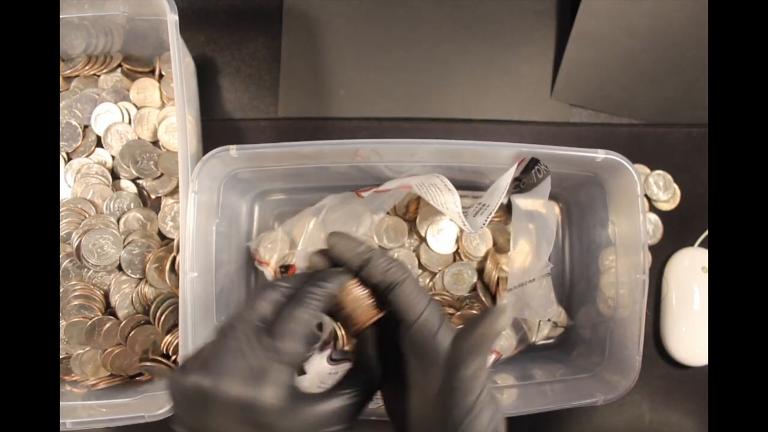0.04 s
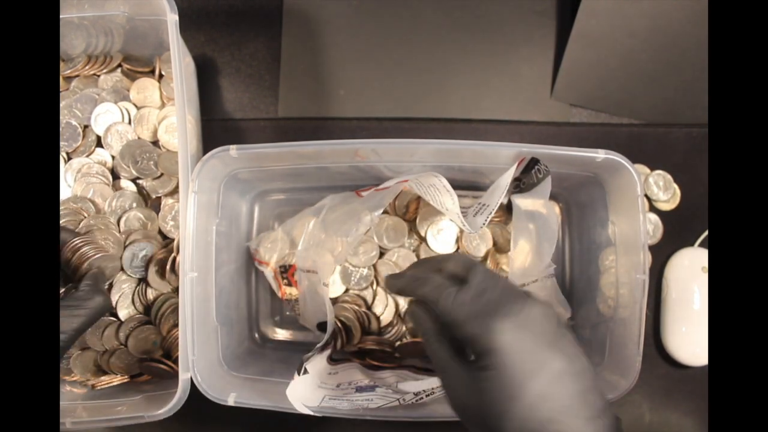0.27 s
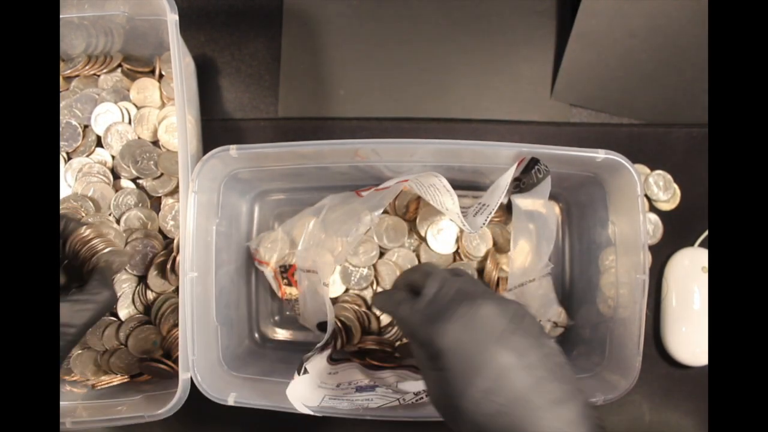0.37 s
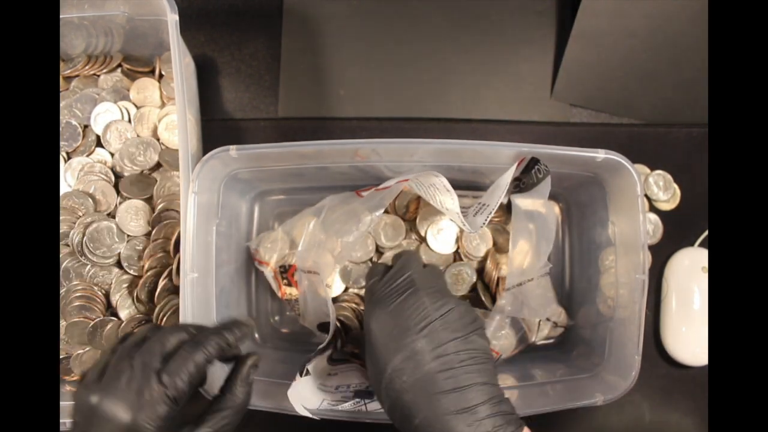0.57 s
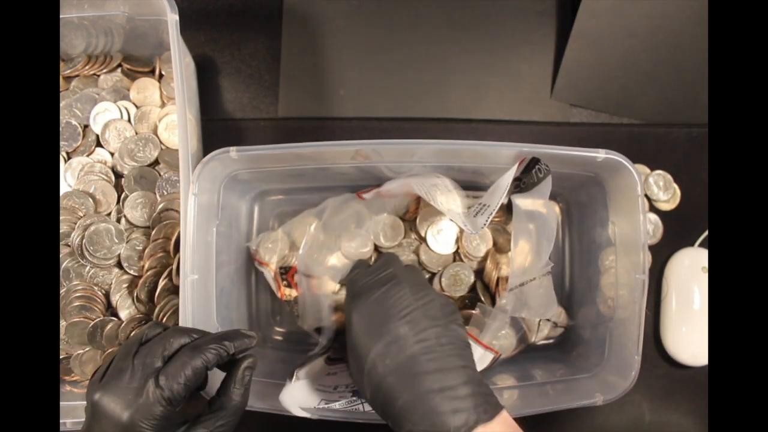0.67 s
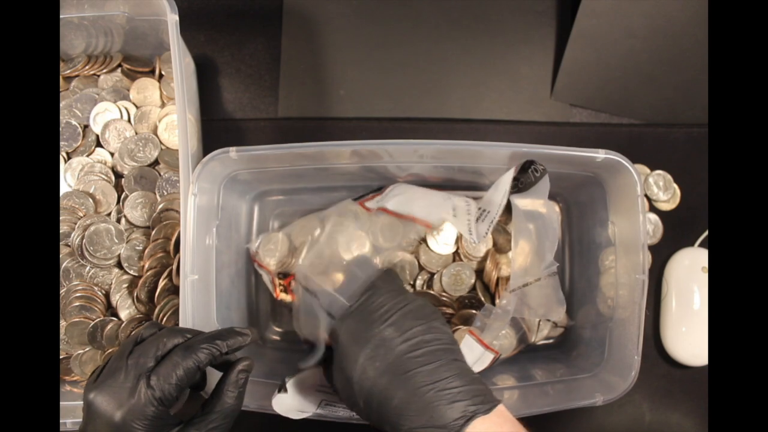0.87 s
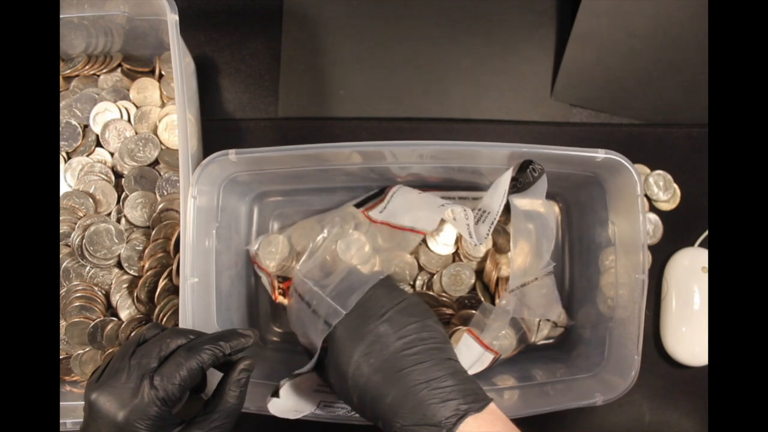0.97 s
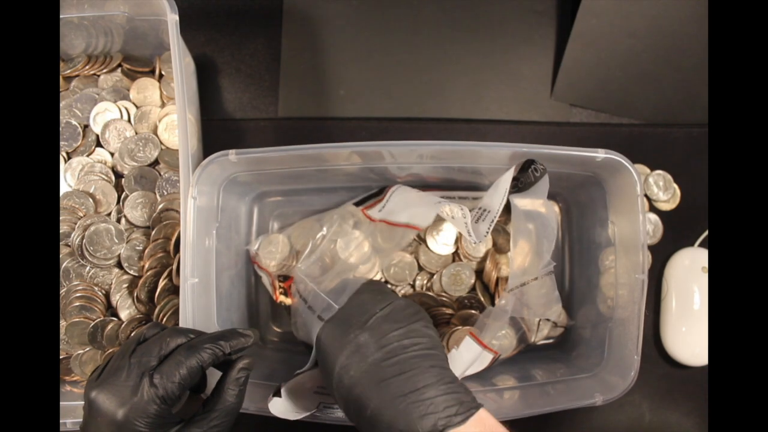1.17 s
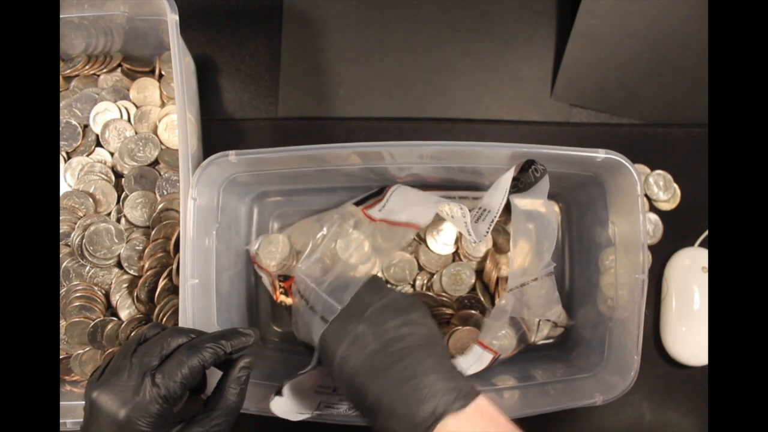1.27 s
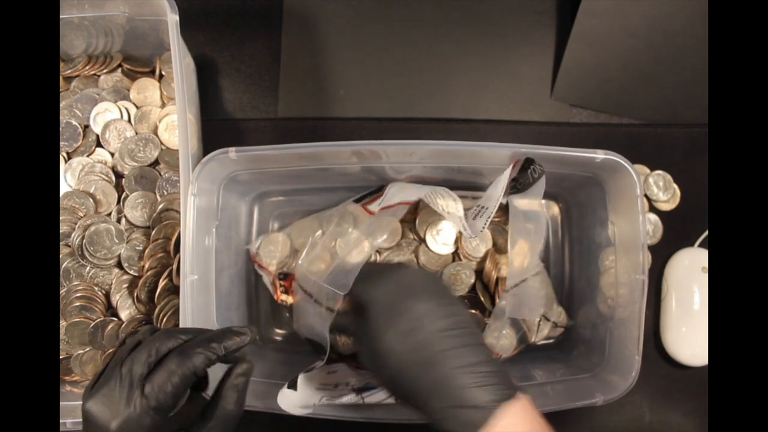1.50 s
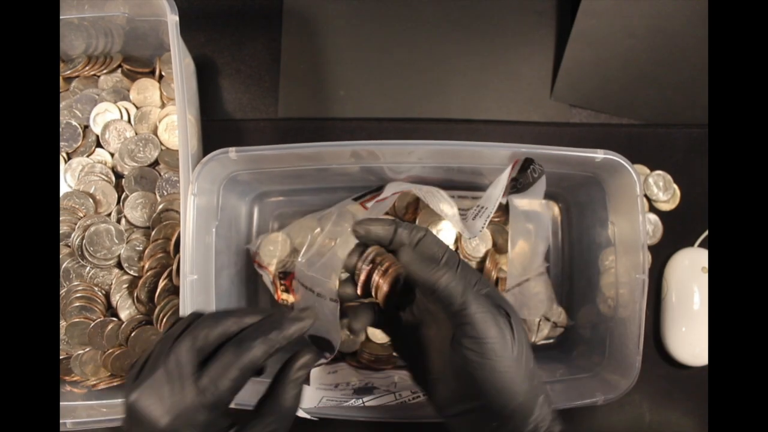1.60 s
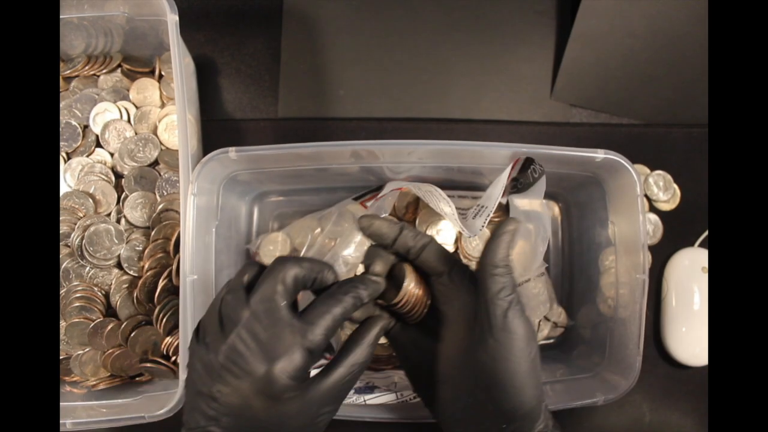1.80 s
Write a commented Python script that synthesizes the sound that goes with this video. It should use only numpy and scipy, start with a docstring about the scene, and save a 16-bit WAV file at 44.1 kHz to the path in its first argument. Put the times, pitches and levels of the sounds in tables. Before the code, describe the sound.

Coins clink and slide, then crunch and jingle as a hand shoves through the pile in short pushes. Paper wrappers crackle and the plastic bin knocks, close by on the left in a small dry room.

```python
"""Gloved hands dig through coins and torn paper wrappers in a plastic bin near the left microphone.
First, loose coins clink and slide. From about 0.45 s the hand shoves the pile in short pushes: many
small impacts merge into a crunch, coins ring, their rims squeak, and the bin knocks and rumbles.
From 0.7 s the wrappers snap as their creases give way. The pushes end near 1.6 s and a few light
clinks follow. Throughout, a small dry room with a faint hum answers."""
import sys
import numpy as np
from scipy import signal
from scipy.fft import rfft, irfft, next_fast_len
from scipy.io import wavfile
from scipy.ndimage import uniform_filter1d, map_coordinates

SR = 44100
rng = np.random.default_rng(int(sys.argv[2]) if len(sys.argv) > 2 else 0)


def unload_audio(sound):
    """Save the sound as a 16-bit wav file, at the path given as the first command line argument."""
    columns = np.transpose(np.atleast_2d(sound))
    # keep every value between -1 and 1, then stretch to whole-number steps
    steps = np.round(np.clip(columns, -1, 1) * 32767)
    wavfile.write(sys.argv[1], SR, steps.astype(np.int16))


N = 81585
TIME = np.arange(N) / SR
COIN_T60_S = 0.048

# Steady digging between pushes. Each row: time in seconds, level in dB.
DIGGING_LEVEL = [(0, -70), (.2, -60.5), (.29, -48), (.36, -38), (.42, -26), (.52, -61), (.62, -26),
                 (.695, -49), (.74, -39), (.87, -28.5), (1.02, -30.5), (1.17, -31.5), (1.31, -27),
                 (1.39, -39), (1.5, -28.5), (1.535, -40), (1.6, -40.5), (1.63, -57), (1.85, -54.5)]
# Pushes of the hand. Each row: peak time, rise and fall in seconds, level in dB.
HAND_PUSHES = [(.458, 0.009, 0.029, -19.5), (.562, 0.025, 0.021, -22.5), (0.65, 0.026, 0.0082, -17),
               (0.723, 0.016, 0.031, -24), (.753, 0.019, 0.0074, -19), (0.831, 0.01, 0.012, -14),
               (0.906, 0.012, 0.015, -14.5), (0.991, 0.017, 0.014, -24), (1.099, 0.042, 0.013, -25.5),
               (1.267, 0.0038, 0.014, -27.5), (1.45, 0.018, 0.015, -20.5), (1.567, 0.011, 0.0039, -28)]
# Coins slipping in the pile. Each row: start in seconds, relative level in dB, T60 in seconds.
COIN_SLIPS = [(.002, -32, 0.056), (.217, -32.5, 0.15), (.433, -17, 0.019), (.456, -15, 0.024),
              (0.475, -13, 0.058), (0.607, -21.5, 0.042), (.747, -23, 0.038), (.7532, -7, 0.012),
              (.783, -15, 0.016), (.7868, -11.5, 0.02), (.8035, -8.5, 0.0055), (.830, -12, 0.033),
              (.880, -17, 0.023), (.9015, -10, 0.054), (.9183, -8, 0.018), (.9235, -11, 0.032),
              (.9545, -16, 0.022), (.979, -11, 0.022), (1.1455, -13.5, 0.024), (1.2005, -13.5, 0.013),
              (1.211, -20.5, 0.04), (1.4737, -12.5, 0.021), (1.497, -14, 0.005), (1.698, -35.5, 0.046)]
# Spectra of the crunch and of ringing coins. Each row: frequency in Hz, relative level in dB.
CRUNCH_SPECTRUM = [(100, -27), (400, -7), (800, -9.5), (1130, 2), (1600, 0.5), (2500, -2.5), (3800, 1.5),
                   (5500, -0.5), (8000, -4), (12000, -6), (15000, -5), (16000, -12)]
RING_SPECTRUM = [(100, -60), (3000, -36), (7000, -22), (9400, 26), (11800, 3), (13200, -31), (14100, -23),
                 (14500, 6), (15300, 38), (16000, -1)]
def coin_pile():
    """Incoherent summation: digging and pushes add in power, driving a crunch of random impacts."""
    power = level(DIGGING_LEVEL) ** 2
    for peak, rise, fall, db in HAND_PUSHES:
        width = np.where(TIME < peak, rise, fall)
        power += amp(db) ** 2 * np.exp(-((TIME - peak) / width) ** 2)
    effort = np.sqrt(power)
    crunch = grains(effort, per_s=1800, spread_db=5, voice=lambda: contact(t60=0.0068))
    rings = grains(effort, per_s=330, spread_db=12, voice=lambda: contact(COIN_T60_S))
    return colour(crunch + snaps(COIN_SLIPS), CRUNCH_SPECTRUM) + amp(-10) * colour(rings, RING_SPECTRUM)


# Coins sliding on top. Each row: time in seconds, level in dB.
SLIDING_LEVEL = [(0, -51), (.2, -78), (.28, -45), (.35, -23.5), (.42, -33), (.47, -16.5), (.53, -36),
                 (.65, -24.5), (.7, -71), (.75, -38), (.95, -74), (1.1, -30), (1.23, -81), (1.28, -43),
                 (1.45, -71), (1.53, -35), (1.57, -28), (1.62, -56), (1.66, -41), (1.73, -82), (1.85, -62)]
# Coin striking coin. Each row: start in seconds, relative level in dB, chatter T60 in seconds.
COIN_CLINKS = [(0.07, -44.5, 0.05), (0.216, -19.5, 0.049), (0.2241, -23, 0.097), (0.2883, -32, 0.023),
               (0.297, -32, 0.04), (.319, -27.5, 0.025), (0.362, -24.5, 0.049), (0.434, -20, 0.066),
               (1.144, -21, 0.035), (1.2565, -18, 0.037), (1.262, -22, 0.058), (1.652, -30.5, 0.022),
               (1.7551, -23.5, 0.029)]
# Spectrum of the clicks. Each row: frequency in Hz, relative level in dB.
CLICK_SPECTRUM = [(100, -39), (600, -40), (2500, -17.5), (5000, -19), (8000, -5), (10500, -2),
                  (12500, -1.5), (13400, 0), (14500, 1.5), (16000, 0.5)]
def loose_coins():
    """Impact excitation: sliding and colliding coins click and set their neighbours ringing."""
    sliding = level(SLIDING_LEVEL)
    clicks = grains(sliding, per_s=840, spread_db=7, voice=lambda: contact(t60=0.021))
    rings = amp(-14) * grains(sliding, per_s=390, spread_db=15, voice=lambda: contact(t60=0.037))
    for start, db, t60 in COIN_CLINKS:
        add(clicks, start, amp(db + 7.5) * contact(t60))
        add(rings, start, amp(db - 18.5) * burst(COIN_T60_S))
    return colour(clicks, CLICK_SPECTRUM) + colour(rings, RING_SPECTRUM)


# Rim scraping rim. Each row: peak time and half length in seconds, pitch in Hz, level in dB.
RIM_SCRAPES = [(.4568, .0015, 3530, -17), (.7265, 0.0014, 8350, -14.5), (.7495, .003, 15000, -18),
               (.905, 0.0051, 3800, -14), (1.110, .004, 14600, -17), (1.151, .004, 15100, -21),
               (1.273, .0025, 14300, -11.5), (1.445, 0.0067, 3800, -20.5), (1.452, 0.011, 5020, -20),
               (1.456, .008, 14500, -22), (1.489, .005, 15000, -28)]
def rim_squeaks():
    """Stick-slip friction: scraping rims give brief tones of fluttering pitch."""
    def squeak(hz):
        phase = np.angle(signal.hilbert(noise_band(hz, width_hz=0.054 * hz)))
        return unit(np.cos(phase))
    return swells(RIM_SCRAPES, squeak)


# Creases giving way. Each row: start in seconds, relative level in dB, T60 in seconds.
CREASE_SNAPS = [(.7175, -17.5, 0.048), (.8035, -8.5, 0.013), (.9838, -9.5, 0.049), (1.033, -15, 0.0091),
                (1.0578, -11, 0.016), (1.066, -15, 0.035), (1.1095, -10.5, 0.017), (1.2725, -9.5, 0.035),
                (1.3025, -22, .02), (1.309, -15, 0.021), (1.3393, -8.5, 0.024), (1.3835, -17.5, 0.0083),
                (1.444, -11.5, 0.02), (1.4508, -16, 0.023), (1.4562, -14.5, 0.016), (1.7195, -31, 0.0059)]
# Spectrum of the paper. Each row: frequency in Hz, relative level in dB.
PAPER_SPECTRUM = [(200, -11.5), (1200, -10.5), (2800, -2.5), (5200, 1.5), (9000, -0.5), (12000, -5),
                  (15500, -3.5)]
def wrappers():
    """Buckling: each paper crease gives way with a thin snap."""
    return colour(snaps(CREASE_SNAPS), PAPER_SPECTRUM)


# Rumble of the bin under the hand. Each row: time in seconds, level in dB.
RUMBLE_LEVEL = [(0, -59), (.19, -64.5), (.3, -44), (.39, -35.5), (.55, -39.5), (.65, -37), (.7, -39.5),
                (.76, -39.5), (.92, -35.5), (1.05, -38.5), (1.25, -35.5), (1.42, -40), (1.55, -39.5),
                (1.62, -49.5), (1.75, -62.5), (1.85, -47.5)]
# Coins hitting the bin. Each row: start in seconds, relative levels of wall and bottom in dB.
BIN_KNOCKS = [(0.2167, -31, -60), (.223, -31, -34), (.433, -17, -57), (.4725, -8, -52), (.4762, -7.5, -25),
              (.4797, -10.5, -34), (.640, -21.5, -36), (0.753, -18, -27), (0.804, -16, -34),
              (.831, -23, -20), (0.879, -16, -25), (0.918, -17.5, -13.5), (1.152, -36, -32),
              (1.347, -24, -30.5), (1.4752, -20, -28.5), (1.496, -16.5, -26.5), (1.566, -49, -28.5)]
# Modes of wall and bottom. Each row: frequency in Hz, relative level in dB, T60 in seconds.
WALL_MODES = [(647, -9, 0.032), (1109, 1.5, 0.043), (1280, 1.5, 0.01), (1514, 7.5, 0.018),
              (1848, 7.5, 0.012), (2230, -5, 0.058), (3160, 3.5, 0.0033)]
BOTTOM_MODES = [(195, -5.5, 0.054), (287, -10, 0.02), (460, 4.5, 0.022), (572, -5, 0.042)]
# Spectrum of the bottom's thuds. Each row: frequency in Hz, relative level in dB.
THUD_SPECTRUM = [(25, -19), (40, -1), (70, -5), (130, -4.5), (220, 2.5), (330, -1), (450, 3.5), (650, -1),
                 (850, -1), (2000, -2), (6000, -55.5)]
def plastic_bin():
    """Damped plate vibration: single knocks ring wall and bottom; dense bumps merge into a rumble."""
    bumps = grains(level(RUMBLE_LEVEL), per_s=400, spread_db=2, voice=lambda: burst(t60=0.03))
    knocks = np.zeros(N)
    for start, wall_db, bottom_db in BIN_KNOCKS:
        add(knocks, start, amp(wall_db) * ring(WALL_MODES, detune=0.026))
        add(knocks, start, amp(bottom_db - 1) * ring(BOTTOM_MODES, detune=0.172))
        add(bumps, start, amp(bottom_db + 0.5) * burst(t60=0.029))
    low_cut = signal.butter(2, 200, "highpass", fs=SR, output="sos")
    return colour(bumps, THUD_SPECTRUM) + signal.sosfilt(low_cut, knocks)


# Hollow tones of the bin. Each row: peak time and half length in seconds, pitch in Hz, level in dB.
BIN_HOLLOW_TONES = [(0.224, 0.011, 640, -34.5), (0.478, 0.003, 680, -23), (0.642, 0.011, 253, -35),
                    (0.908, 0.0063, 455, -28.5), (0.921, 0.0076, 253, -28.5), (1.149, 0.0077, 364, -29),
                    (1.222, 0.0066, 650, -31.5), (1.354, 0.0094, 593, -33), (1.396, 0.0072, 373, -35.5),
                    (1.504, 0.0074, 176, -35.5), (1.556, 0.022, 222, -34.5), (1.71, 0.0089, 1010, -40.5)]
def hollow_tones():
    """Resonance: short hollow tones of the bin, the body of knocks and thumps, and glove rubs."""
    return swells(BIN_HOLLOW_TONES, lambda hz: noise_band(hz, width_hz=0.4 * hz))


def table_sway():
    """Forced vibration: the table sways under the hand, loosely following the bin's rumble."""
    return amp(-57.5) * unit(level(RUMBLE_LEVEL) ** 0.31) * noise_band(36.8, width_hz=3.1)


# Reverberation time. Each row: frequency in Hz, T60 in seconds.
TAIL_T60 = [(200, 0.15), (1500, 0.22), (6000, 0.078), (15000, 0.12)]
# Spectrum of the reverberation. Each row: frequency in Hz, relative level in dB.
TAIL_SPECTRUM = [(100, -40), (500, -22.5), (1500, -17.5), (5000, -15), (15000, -17)]
def room(x, places=24, delay_s=0.001528):
    """Diffuse reverberation: a short tail differs for each microphone and each place the hand stirs."""
    out, place = np.zeros((2, N)), np.linspace(0, places - 1, N)
    for k in range(places):
        hz, t, noise = signal.stft(rng.standard_normal((2, SR // 3)), SR, nperseg=256)
        decay = amp(-60 * t / along(TAIL_T60, hz)[:, None])
        decay /= np.sqrt(np.sum(decay ** 2, 1, keepdims=True) * t[1] * SR)  # unit energy per band
        tail = signal.istft(noise * decay * amp(along(TAIL_SPECTRUM, hz))[:, None], SR, nperseg=256)[1]
        part = np.flatnonzero(np.abs(place - k) < 1)
        crossfade = np.cos(np.pi / 2 * (place[part] - k))
        wet = signal.fftconvolve((x[part] * crossfade)[None], tail, axes=1)
        for channel in range(2):
            add(out[channel], part[0] / SR + delay_s, wet[channel])
    return out


# Spectrum of the room air. Each row: frequency in Hz, relative level in dB.
AIR_SPECTRUM = [(25, -11), (60, -9), (120, 4.5), (250, -1.5), (500, 3.5), (1000, -4), (2500, -11.5),
                (6000, -19), (16000, -21)]
def background(hum_hz=241.7):
    """Noise floor: broadband room air and a faint steady hum, both stronger on the left."""
    air = colour(rng.standard_normal((2, N)), AIR_SPECTRUM)
    hum = np.sqrt(2) * np.sin(2 * np.pi * hum_hz * TIME)
    return air * amp([[-54.5], [-57.5]]) + hum * amp([[-59], [-67]])


def grains(envelope, per_s, spread_db, voice, count=16):
    """Shot noise: random impacts of uneven size follow an envelope, shared among several voices."""
    hits = (rng.random(N) < per_s / SR) * amp(spread_db * np.clip(rng.standard_normal(N), -2, 2))
    hits *= rng.choice([-1, 1], N)
    local_power = np.abs(uniform_filter1d(hits ** 2, size=900))
    hits = envelope * hits / np.sqrt(local_power + 1e-3)
    owner, out = rng.integers(count, size=N), np.zeros(N)
    for k in range(count):
        response = voice()
        out += signal.fftconvolve(hits * (owner == k), response / np.linalg.norm(response))[:N]
    return out


def snaps(rows):
    """Sudden release: each snap is a dry crack with a short chatter."""
    out = np.zeros(N)
    for start, db, t60 in rows:
        chatter, crack = contact(t60), amp(3) * contact(t60=0.006)
        add(out, start, amp(db) * (chatter + crack))
    return out


def contact(t60, size=6000, attack_s=0.00029, ripple_db=3.5, ripple_hz=391.3):
    """Resonance: a burst gets random spectral peaks, since each coin and crease differs."""
    x = burst(t60, size) * (1 - np.exp(-np.arange(size) / SR / attack_s))
    position = np.fft.rfftfreq(size, 1 / SR) / ripple_hz
    ripple = map_coordinates(rng.standard_normal(size=200), [position], mode="mirror")
    return irfft(rfft(x) * minimum_phase(unit(amp(ripple_db * ripple))))


def burst(t60, size=6000):
    """Exponential decay: a spray of tiny contacts falls 60 dB in t60 seconds."""
    return rng.standard_normal(size) * amp(-60 * np.arange(size) / SR / t60)


def ring(modes, detune, size=6000):
    """Modal superposition: damped sines, a little different at each strike."""
    hz, db, t60 = np.transpose(modes)[:, :, None]
    t = np.arange(size) / SR
    gain = amp(db + 2 * rng.standard_normal(hz.shape)) * rng.choice([-1, 1], hz.shape)
    hz = hz * (1 + detune * rng.standard_normal(hz.shape))
    partials = gain * np.sin(2 * np.pi * hz * t) * amp(-60 * t / t60)
    return np.sqrt(2) * np.sum(partials, 0) / np.linalg.norm(gain)


def swells(rows, voice):
    """Amplitude modulation: each tone swells and fades under a Gaussian envelope."""
    out = np.zeros(N)
    for peak, half_length, hz, db in rows:
        shape = np.exp(-((TIME - peak) / half_length) ** 2)
        out += amp(db) * np.sqrt(np.mean(shape ** 2)) * unit(shape * voice(hz))
    return out


def noise_band(hz, width_hz):
    """Band-limited noise: a fuzzy tone of rms 1."""
    band = np.exp(-((np.fft.rfftfreq(N, 1 / SR) - hz) / width_hz) ** 2)
    return unit(irfft(rfft(rng.standard_normal(N)) * band, N))


def colour(x, spectrum):
    """Spectral shaping: a causal filter that keeps the power of white noise."""
    size = 2 * next_fast_len(N)
    gain = unit(amp(along(spectrum, np.fft.rfftfreq(size, 1 / SR))))
    return irfft(rfft(x, size) * minimum_phase(np.maximum(gain, 1e-6)))[..., :N]


def minimum_phase(gain):
    """Causality: folding the cepstrum onto positive time keeps the gain and removes pre-ringing."""
    cepstrum = irfft(np.log(gain))
    half = len(cepstrum) // 2
    cepstrum[1:half] *= 2
    cepstrum[half + 1:] = 0
    return np.exp(rfft(cepstrum))


def amp(db):
    """Decibels to gain."""
    return 10 ** (np.asarray(db) / 20)


def unit(x):
    """Normalisation to rms 1."""
    return x / np.sqrt(np.mean(x ** 2) + 1e-20)


def along(points, hz):
    """Interpolation on a log frequency axis."""
    frequencies, values = np.transpose(points)
    return np.interp(np.log(hz + 1), np.log(frequencies + 1), values)


def level(rows):
    """Interpolation of levels in dB to a gain for each sample."""
    return amp(np.interp(TIME, *np.transpose(rows)))


def add(track, start, x):
    """Superposition of x on the track, from start in seconds."""
    i = max(0, round(start * SR))
    track[i:i + len(x)] += x[:max(0, N - i)]


def scene():
    """Direct and reverberant fields: the left microphone hears both, the right only the room."""
    near = coin_pile() + wrappers() + loose_coins() + rim_squeaks()
    near += plastic_bin() + hollow_tones() + table_sway()
    return np.array([near, np.zeros(N)]) + room(near) * amp([[7], [0]]) + background()


def record(dry, top_hz=16150):
    """Clipping and band limiting: peaks stop at full scale, then the highest treble is cut."""
    size = 2 * next_fast_len(N)
    passband = np.clip((top_hz - np.fft.rfftfreq(size, 1 / SR)) / 300, 0, 1)
    return irfft(rfft(np.clip(dry, -1, 1), size) * passband, size)[:, :N]


dry = scene()
out = record(dry)
unload_audio(out)
```